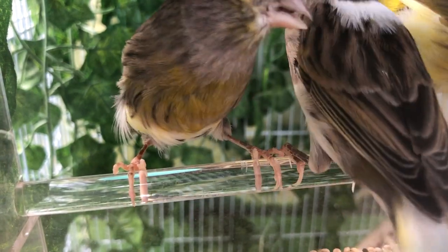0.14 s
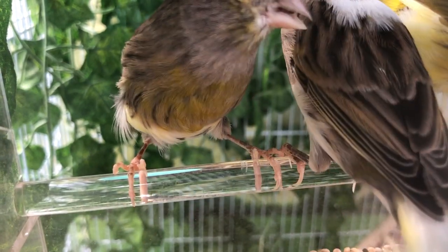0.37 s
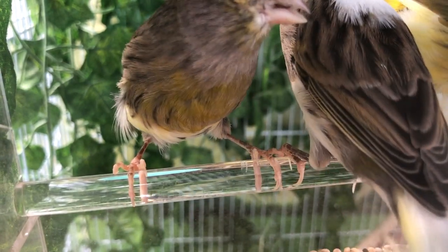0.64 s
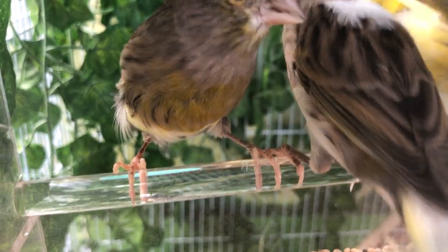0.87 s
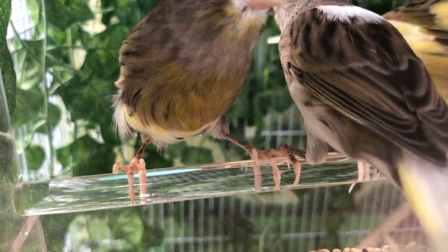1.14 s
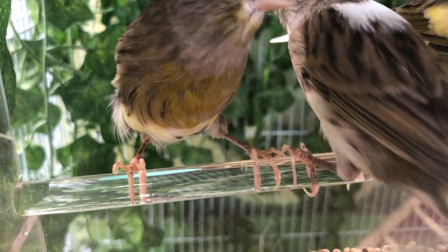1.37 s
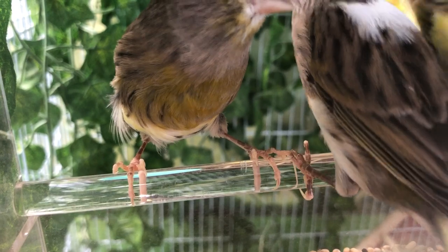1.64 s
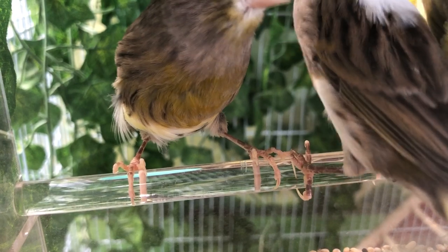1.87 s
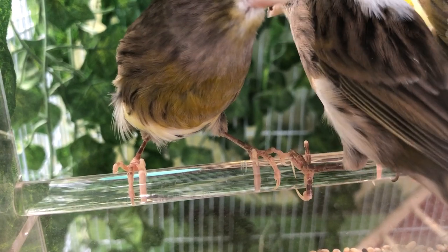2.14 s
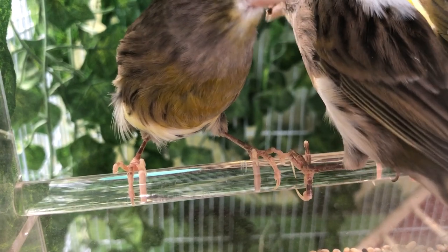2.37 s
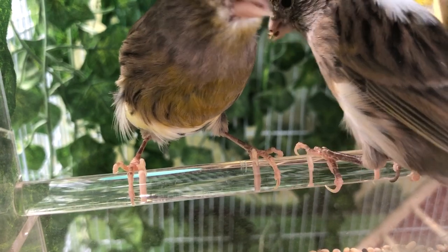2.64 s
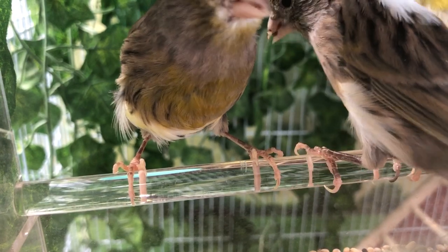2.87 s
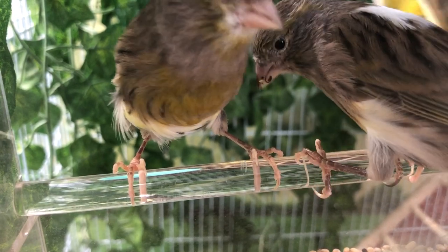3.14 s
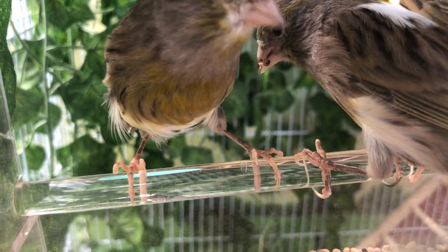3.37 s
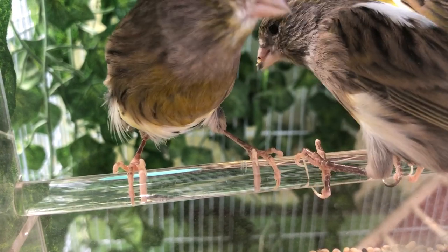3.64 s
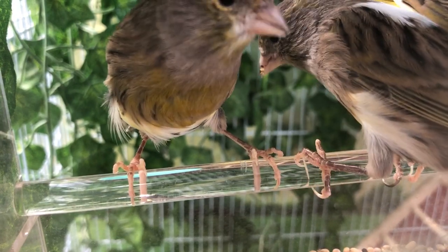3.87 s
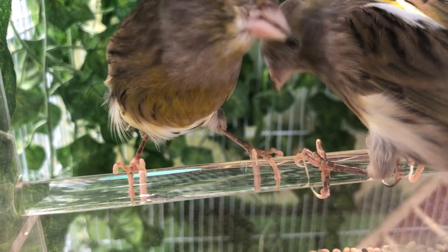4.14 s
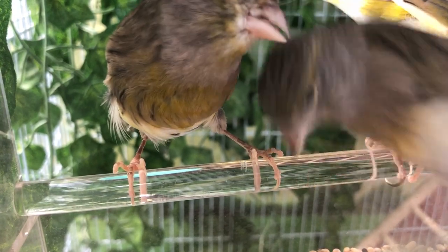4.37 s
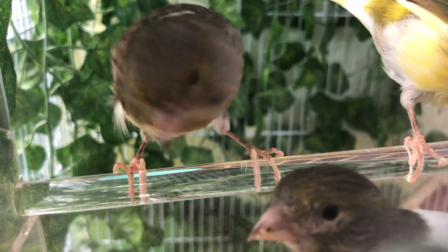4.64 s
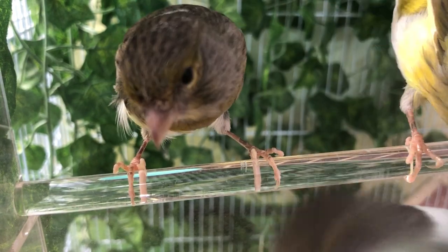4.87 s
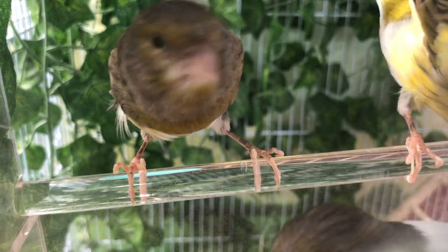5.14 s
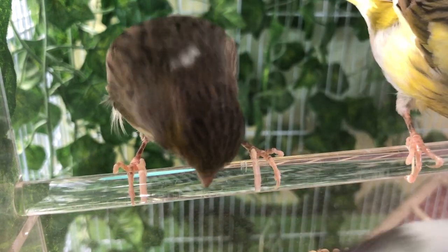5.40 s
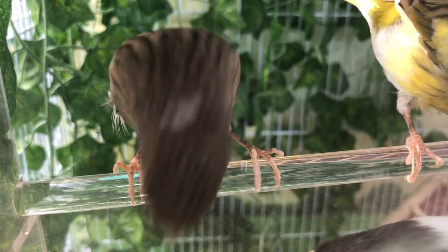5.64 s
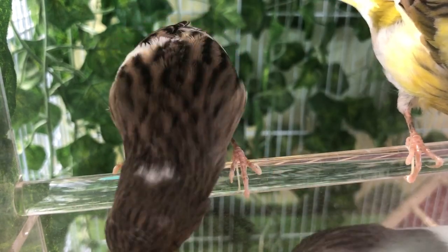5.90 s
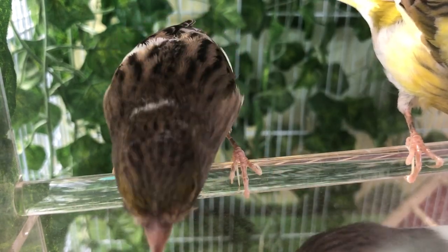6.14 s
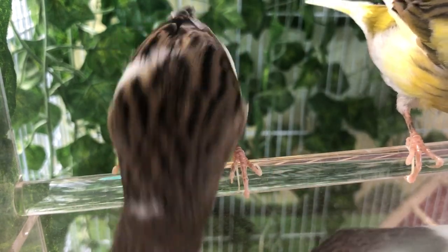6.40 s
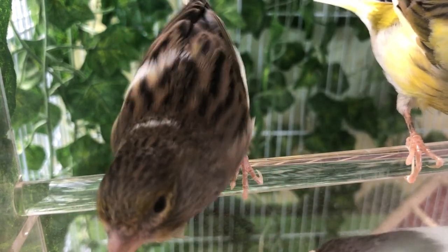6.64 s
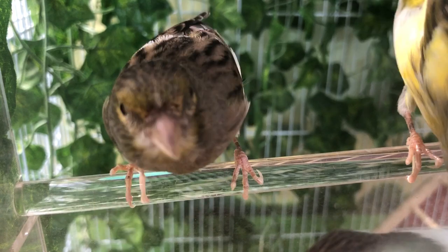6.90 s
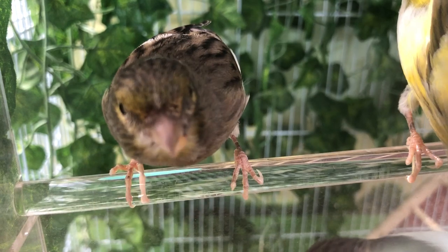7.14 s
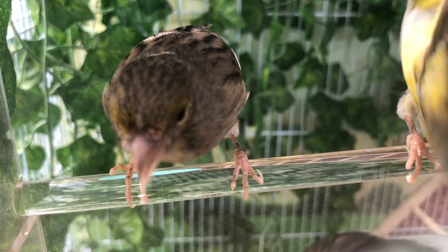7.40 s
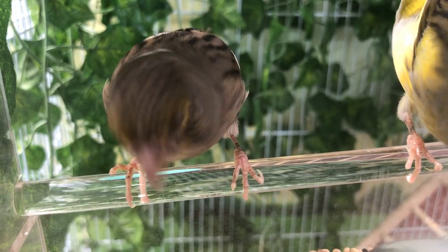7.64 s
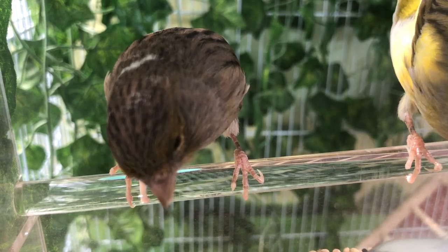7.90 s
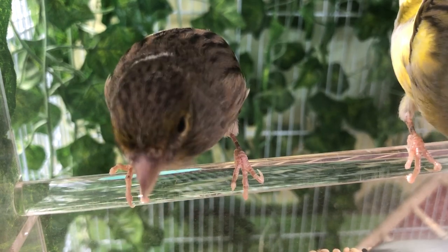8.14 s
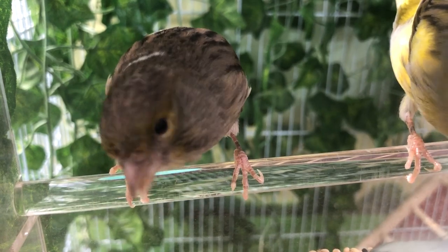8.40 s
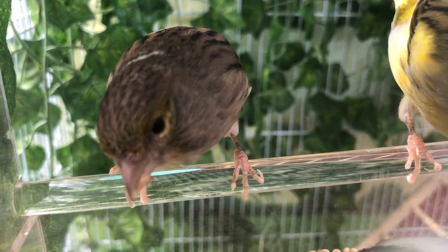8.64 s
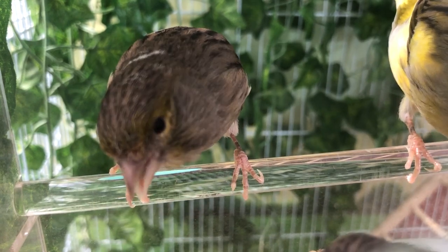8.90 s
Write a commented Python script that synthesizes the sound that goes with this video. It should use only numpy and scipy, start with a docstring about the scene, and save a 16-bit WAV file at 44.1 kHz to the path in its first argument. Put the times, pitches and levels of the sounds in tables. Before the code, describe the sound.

In a small, lightly echoing indoor aviary, canaries shuffle close to the microphone, feet knocking on the perch and claws ticking on wire. Short gliding chirps and distant rasps mix with faint flock chatter. A wavering dove-like coo comes three times. Paired chirps cluster in the first half, then a near bird breaks into loud, harsh rasping bursts through the second half over a soft steady room floor.

```python
"""Inside an aviary, one microphone: over a steady room floor feathers rustle, feet knock on the perch (struck modes)
and claws and husks tick on the wire (noise snaps). Birds further off rasp, others give single gliding notes,
a far flock chatters mostly as echo. A dove coos three times (wavering near sine), wing wash pushes air on the
microphone (low noise), a near bird rasps in harsh bursts (pulsed noise through throat and beak), two-voiced chirps
follow (overlapping gliding tones), and late on a faint low drone sets in."""
import sys
import numpy as np
from scipy import signal
from scipy.fft import rfft, irfft, next_fast_len
from scipy.io import wavfile
from scipy.ndimage import map_coordinates

SR = 44100
rng = np.random.default_rng(int(sys.argv[2]) if len(sys.argv) > 2 else 0)


def materialize(psi):
    """Save the field psi as 16-bit PCM at rate SR to the path in sys.argv[1].

    A 1-D psi becomes a single channel; in a 2-D psi each row is a channel.
    """
    bounded = np.clip(np.atleast_2d(psi).T, -1, 1)
    quanta = np.round(bounded * 32767).astype(np.int16)
    wavfile.write(sys.argv[1], SR, quanta)


def invert_db(x):
    """Field ratio 10**(x/20) for x, a level in decibels (scalar or array-like)."""
    u = np.asarray(x, float) / 20
    return 10 ** u


N = 397782   # samples

# room floor, relative spectrum: hz, level_db (per Hz)
FLOOR_SPECTRUM = [(15, -41), (25, 4.5), (145, -2), (277, -5.5), (451, -4.5), (800, -6), (2410, -10),
                  (4370, -19), (7710, -25.5), (16000, -24)]
FLOOR_DB = -60
ROOM_T60_S, WALL_CUT_HZ = 0.3, 8900

# feathers and shuffling feet: start_s, length_s, level_db
RUSTLES = [(0.0, 0.071, -51), (0.9, 0.12, -42.5), (1.06, 0.5, -52.5), (4.495, 0.18, -52.5),
           (5.06, 0.49, -55.5)]
RUSTLE_RISE_S, RUSTLE_FALL_S, RUSTLE_SLOPE_DB_PER_S = 0.0069, 0.013, -21

# feet landing on the perch: start_s, strike_db (before the level of each mode)
LANDINGS = [(0.037, -31), (0.948, -13), (0.956, -14.5), (1.051, -25), (1.087, -26), (1.184, -29),
            (1.23, -28), (1.554, -27.5), (1.679, -25), (2.665, -28), (4.501, -27.5), (4.585, -26),
            (4.646, -27), (5.121, -13.5), (5.126, -16), (5.267, -25), (5.768, -31.5)]
# ringing modes of the perch: mode_hz, level_db (relative), t60_s
PERCH_MODES = [(225, -2, 0.041), (336, -4, 0.05), (539, 0, 0.054), (605, -9, 0.033), (743, -14.5, 0.057),
               (1380, -6.5, 0.013), (1700, -14.5, 0.031), (2140, -23, 0.041), (2900, -7.5, 0.0052)]

# the clearest snaps of claws and husks on wire: start_s, peak_db
CLEAR_TICKS = [(0.038, -39), (0.099, -38), (0.134, -30.5), (0.1624, -32.5), (0.182, -41), (0.234, -32),
               (0.2893, -41), (0.556, -48), (0.9125, -19), (0.959, -14), (0.9917, -21), (1.002, -21),
               (1.056, -20.5), (1.107, -23), (1.492, -30), (1.557, -31), (1.904, -30), (2.807, -31),
               (3.084, -34), (3.5194, -19), (4.3375, -30), (4.5247, -23), (4.6, -32), (4.7425, -27.5),
               (5.075, -23.5), (5.092, -22), (5.12, -22), (5.127, -31), (5.147, -30), (5.159, -21),
               (5.184, -18), (5.253, -32), (5.602, -31), (5.7993, -20), (6.129, -21), (6.5513, -22),
               (6.8863, -20), (7.074, -37), (7.087, -30), (7.1516, -31), (7.233, -21), (7.2806, -28.5),
               (7.6466, -21), (9.01, -29)]
SMALL_TICK_DB = -47   # middle of the small ones' range
TICK_LOW_HZ, TICK_HIGH_HZ = 2500, 6000   # range of the bass edge of a snap

# harsh calls of birds further off: start_s, fade_s, level_db
FAR_RASPS = [(0.238, 0.089, -56.5), (0.383, 0.11, -48.5), (0.618, 0.033, -55.5), (0.8, 0.056, -42),
             (1.09, 0.15, -50), (1.54, 0.13, -49.5), (2.854, 0.046, -41), (3.24, 0.14, -56.5),
             (3.44, 0.019, -48), (5.598, 0.064, -42), (5.72, 0.05, -45.5)]
# throat of the further birds, relative spectrum: hz, level_db (per Hz)
FAR_THROAT = [(470, -66.5), (800, -40), (1440, -5), (1930, -8), (3050, -2.5), (4970, -12), (15000, -27.5)]
# harsh calls of the near bird, one row a burst: start_s, fade_s, level_db
NEAR_RASPS = [(1.714, 0.057, -30), (5.905, 0.056, -27.5), (6.024, 0.029, -24), (6.137, 0.068, -25.5),
              (6.299, 0.063, -25.5), (6.451, 0.073, -25), (6.607, 0.085, -25.5), (7.375, 0.055, -27),
              (7.425, 0.1, -31.5), (7.712, 0.079, -27.5), (8.013, 0.057, -26), (8.172, 0.056, -24.5),
              (8.308, 0.053, -27), (8.618, 0.1, -27.5), (8.797, 0.1, -28)]
# throat of the near bird, relative spectrum: hz, level_db (per Hz)
NEAR_THROAT = [(530, -107), (900, -25.5), (2250, -15.5), (2890, -7), (3230, -10), (4250, -0.5), (4740, -4),
               (6250, -10.5), (8660, -18), (10600, -19), (13000, -26), (15800, -23.5), (16500, -59)]
# resonances of its throat and beak: centre_hz, width_hz, level_db (relative)
NEAR_PEAKS = [(3600, 240, -6), (4250, 220, -1), (4800, 260, -4), (5450, 260, 1), (6300, 340, 2)]
NEAR_SWELL_S, FAR_SWELL_S = 0.043, 0.03
PEAK_WANDER_SHARE, PEAK_WANDER_HZ = 0.04, 9

# single gliding notes, mostly of other birds, some further notes of the two-voiced chirps: start_s, length_s,
# start_hz, end_hz, level_db
SINGLE_NOTES = [(0.248, 0.057, 598, 560, -61), (0.631, 0.024, 574, 566, -64.5),
                (0.787, 0.028, 2900, 4600, -44), (0.812, 0.061, 2900, 3660, -48),
                (0.833, 0.097, 1700, 1150, -52.5), (0.919, 0.038, 3595, 2780, -39.5),
                (1.106, 0.035, 3940, 3930, -39), (1.109, 0.028, 2000, 1890, -49),
                (1.142, 0.061, 1146, 1110, -49), (1.179, 0.062, 2100, 2500, -47),
                (1.22, 0.045, 4000, 3620, -45.5), (1.238, 0.043, 1270, 1160, -49),
                (1.462, 0.08, 1643, 2350, -54), (1.523, 0.033, 2860, 2900, -44),
                (1.607, 0.041, 3960, 3440, -45.5), (2.33, 0.049, 5130, 5620, -44.5),
                (2.396, 0.018, 4620, 4560, -39), (2.425, 0.031, 3930, 4400, -41),
                (2.403, 0.043, 3600, 3816, -31.5), (2.604, 0.05, 3630, 4110, -34),
                (2.591, 0.079, 4300, 4840, -39.5), (3.404, 0.063, 2750, 3350, -50.5),
                (2.881, 0.054, 3450, 3095, -36.5), (3.434, 0.055, 1440, 1880, -45.5),
                (3.58, 0.022, 4470, 4610, -37), (4.286, 0.094, 3160, 3324, -35.5),
                (4.29, 0.029, 4330, 3840, -48), (4.496, 0.037, 3310, 2820, -42),
                (4.661, 0.066, 2350, 2083, -48), (4.857, 0.03, 3960, 3700, -50),
                (4.905, 0.028, 3580, 3690, -40), (4.96, 0.05, 2783, 2940, -40.5),
                (4.966, 0.034, 1824, 2100, -53), (5.006, 0.067, 3100, 2847, -41),
                (5.316, 0.071, 2810, 3720, -51), (5.629, 0.032, 5180, 4920, -42),
                (5.731, 0.04, 3640, 3520, -39.5), (5.775, 0.063, 4010, 4245, -35),
                (5.895, 0.029, 3600, 3480, -39), (5.773, 0.051, 2024, 2393, -41.5),
                (6.603, 0.034, 1700, 1700, -41), (6.806, 0.038, 2690, 2807, -41),
                (6.91, 0.066, 3960, 3210, -44), (7.004, 0.034, 1936, 2670, -42),
                (7.032, 0.056, 4220, 3780, -42.5), (7.07, 0.07, 2574, 2593, -38),
                (7.166, 0.047, 2486, 2460, -40), (7.214, 0.045, 2180, 1380, -44),
                (7.254, 0.034, 2270, 2276, -41), (7.335, 0.033, 2587, 2580, -35.5),
                (7.345, 0.089, 3740, 3820, -34.5), (7.528, 0.024, 5300, 5170, -31),
                (7.54, 0.04, 2635, 2705, -37), (7.632, 0.093, 2600, 2415, -46),
                (7.916, 0.078, 4070, 3980, -35), (7.969, 0.019, 5200, 6000, -41.5),
                (8.131, 0.039, 3025, 4020, -29.5), (8.163, 0.019, 3820, 3750, -29.5),
                (8.441, 0.061, 3500, 3486, -30.5), (8.531, 0.078, 2500, 2465, -41),
                (8.755, 0.029, 3220, 3157, -36), (8.964, 0.047, 4084, 3780, -33)]
# two-voiced chirps, upper voice: start_s, length_s, start_hz, end_hz, level_db
UPPER_VOICE = [(2.307, 0.041, 4450, 3350, -33.5), (2.345, 0.026, 3550, 4300, -40),
               (2.512, 0.041, 4510, 3360, -32.5), (2.757, 0.028, 4200, 3850, -43),
               (2.868, 0.031, 5000, 3700, -32), (2.885, 0.1, 4106, 3670, -34),
               (3.547, 0.061, 4250, 3700, -30.5), (3.619, 0.04, 3950, 3830, -27.5),
               (3.697, 0.026, 4600, 4450, -45), (3.717, 0.06, 3550, 4150, -32.5),
               (3.9, 0.072, 4300, 3500, -42), (4.143, 0.085, 4470, 3600, -34),
               (4.238, 0.044, 3760, 3600, -28)]
# two-voiced chirps, lower voice: start_s, length_s, start_hz, end_hz, level_db
LOWER_VOICE = [(2.337, 0.04, 2580, 2830, -37.5), (2.362, 0.062, 3000, 3410, -36),
               (2.544, 0.068, 2610, 3170, -36), (2.776, 0.16, 2740, 2743, -48),
               (2.8, 0.063, 3140, 3070, -43.5), (2.938, 0.063, 2950, 3194, -37),
               (3.591, 0.06, 3050, 3030, -34.5), (3.665, 0.044, 2968, 3247, -32),
               (3.778, 0.061, 2980, 3045, -34), (3.951, 0.079, 2815, 2730, -50),
               (4.188, 0.045, 3100, 2803, -35), (4.27, 0.032, 2773, 2714, -32)]
GLIDE_HOOK = 0.36   # below 1: a note glides fast at first, then levels off
# overtones 2, 3, .. of high, nearly pure notes: level_db against the fundamental
PURE_DB = [-18, -29]
# overtones 2, 3, .. of lower, reedy notes: level_db against the fundamental
REEDY_DB = [3, -9, -16, -14]
# overtones 2, 3, .. of the lowest, nasal notes: level_db against the fundamental
NASAL_DB = [0.5, 8, -1, 7, -2, -2]
REEDY_BELOW_HZ, NASAL_BELOW_HZ = 2200, 800

# far flock, before its direct and echo shares: start_s, level_db, pitch_hz (around which notes scatter)
FLOCK = [(0.77, -89.5, 2330), (0.95, -56, 1845), (2.22, -52, 1975), (2.33, -56.5, 2814),
         (3.02, -55.5, 2698), (3.14, -58, 1792), (3.48, -54.5, 1882), (3.69, -46, 2988), (4.1, -60.5, 2500),
         (4.47, -62, 2750), (4.79, -54.5, 1965), (5.0, -48.5, 2900), (5.34, -56, 2422), (5.59, -47, 2576),
         (6.45, -63, 2950), (6.58, -39.5, 2586), (6.84, -53.5, 2624), (7.29, -49.5, 2395),
         (7.48, -47.5, 2454), (9.02, -45, 2498)]

# dove, one table a coo: start_s, pitch_hz, level_db
COOS = [
    [(0.88, 506, -50), (0.91, 609, -45), (1.17, 586, -50.5), (1.23, 520, -54.5), (1.412, 526.3, -49),
     (1.6, 544.4, -39.5), (1.82, 613, -44), (1.91, 560, -39), (2.23, 545.4, -42.5), (2.36, 491, -49),
     (2.52, 483, -79)],
    [(3.795, 515, -51), (3.82, 542, -45), (3.838, 620, -33), (4.0, 607, -49), (4.07, 606, -39.5),
     (4.11, 538, -43), (4.28, 569, -46.5), (4.5, 566, -37), (4.55, 608, -43.5), (4.63, 617, -34.5),
     (4.72, 611, -41.5), (4.8, 545, -36.5), (4.86, 504, -54.5), (4.97, 400, -64)],
    [(6.425, 496, -48), (6.465, 616, -38), (6.59, 614, -40), (6.7, 597, -51), (6.77, 536, -50.5),
     (7.12, 592, -42.5), (7.19, 623, -40.5), (7.3, 622, -36.5), (7.38, 615, -36.5), (7.46, 600.7, -44.5),
     (7.688, 550.4, -37.5), (7.82, 493, -52), (7.96, 495, -69)],
]
# syllables that the dove takes from below, after a short catch: start_s
SYLLABLES = [1.23, 1.7, 4.038, 4.567, 6.645, 7.215]
# moments when the dove's voice breaks: centre_s
BREAKS = [1.618, 1.86, 2.281, 3.9, 4.015, 4.09, 6.55, 6.628, 6.725, 6.83, 7.146, 7.341, 7.484]
SCOOP_SHARE, SCOOP_S, CATCH_DB, CATCH_S = 0.11, 0.03, -8, 0.006
BREAK_DB, BREAK_S = -20, 0.011

# wing wash on the microphone: start_s, length_s, level_db
WASHES = [(0.95, 0.55, -47), (2.9, 0.034, -47.5), (5.14, 0.31, -48), (6.3, 0.026, -43.5)]
WASH_RISE_S, WASH_FALL_S, WASH_SLOPE_DB_PER_S = 0.058, 0.1, 0.5

DRONE_FROM_S, DRONE_HZ, DRONE_WIDTH_HZ, DRONE_DB = 7.56, 159.3, 45, -65.5


def rms_one(x):
    """Scale to rms 1."""
    return x / np.sqrt(np.mean(x ** 2) + 1e-20)


def in_time(tables, quiet_db=-110, edge_s=0.012):
    """Join tables into one curve per column; a last gate curve falls silent between tables."""
    rows = []
    for table in tables:
        rows += [(table[0][0] - edge_s, *table[0][1:], quiet_db)]
        rows += [(*row, 0) for row in table]
        rows += [(table[-1][0] + edge_s, *table[-1][1:], quiet_db)]
    s, *columns = np.transpose(rows)
    *columns, gate_db = [np.interp(np.arange(N) / SR, s, c) for c in columns]
    return *columns, invert_db(gate_db)


def bouts(rows, rise_s, fall_s, slope_db_per_s):
    """Gain of separate bouts: each rises, slides in level while it lasts, and falls."""
    t = np.arange(N) / SR
    gain = np.zeros(N)
    for s, length, level_db in rows:
        rise = np.clip((t - s) / rise_s, 0, 1)
        fall = np.clip(1 + (s + length - t) / fall_s, 0, 1)
        gain += rise * fall * invert_db(level_db + slope_db_per_s * np.clip(t - s, 0, length))
    return gain


def drift(rate_hz):
    """Random wander of rms 1: noise through two equal low-pass poles at rate_hz."""
    r = np.exp(-2 * np.pi * rate_hz / SR)
    return rms_one(signal.lfilter([1], [1, -2 * r, r * r], rng.standard_normal(N + SR))[SR:])


def coloured(x, spectrum):
    """Shape a white signal by a spectrum; rms 1."""
    hz, level_db = np.transpose(spectrum)
    size = next_fast_len(N)
    bins = np.arange(1, size // 2 + 2) * SR / size
    gain = invert_db(np.interp(np.log(bins), np.log(hz), level_db))
    return rms_one(irfft(rfft(x, size) * gain, size)[:N])


def cut(x, hz, kind):
    """Second-order high-, low- or band-pass."""
    return signal.sosfilt(signal.butter(2, hz, kind, fs=SR, output="sos"), x + 1e-18)


def resonate(x, hz, width_hz):
    """One resonance, gain 1 on top."""
    r = np.exp(-np.pi * width_hz / SR)
    top = np.array([1, 0, -1]) * (1 - r * r) / 2
    return signal.lfilter(top, [1, -2 * r * np.cos(2 * np.pi * hz / SR), r * r], x + 1e-18)


def room_floor():
    """Steady coloured noise of the place, its level hardly moving."""
    return invert_db(FLOOR_DB) * coloured(rng.standard_normal(N), FLOOR_SPECTRUM) * invert_db(0.5 * drift(3.0))


def rustle():
    """Clumped bright grains over a dry hiss, settling down after each start."""
    born = rng.random(N) < 900 * invert_db(6 * drift(30)) / SR   # about 900 grains a second, in clumps
    size_db = 5.0 * np.minimum(rng.exponential(1, N), 5)
    grains = born * invert_db(size_db) * rng.choice([-1, 1], N)
    hiss = rng.standard_normal(N) * invert_db(3.5 * drift(40))
    gain = bouts(RUSTLES, RUSTLE_RISE_S, RUSTLE_FALL_S, RUSTLE_SLOPE_DB_PER_S)
    return gain * rms_one(cut(rms_one(grains) + 14.0 * hiss, 870, "high"))


def knocks():
    """Every landing rings the perch modes; light feet land softly and leave the upper modes weak."""
    s, strike_db = np.transpose(LANDINGS)
    chance_db = rng.normal(0, 2.5, (len(s), len(PERCH_MODES)))
    tilt_db = 0.54 * (strike_db - strike_db.max())   # per octave
    out = np.zeros(N)
    for k, (hz, level_db, t60) in enumerate(PERCH_MODES):
        clicks = np.full(N, 1e-18)
        clicks[(s * SR).astype(int)] = invert_db(strike_db + level_db + chance_db[:, k] + tilt_db * np.log2(hz / 230))
        r, w = invert_db(-60 / (t60 * SR)), 2 * np.pi * hz / SR
        out += signal.lfilter([0, np.sin(w)], [1, -2 * r * np.cos(w), r * r], clicks)
    return cut(out, 636, "high")   # a thin rod radiates no bass


def ticks():
    """Each tick is a bright noise snap with a decay of 0.9 ms; small ones come at random."""
    out, t = np.zeros(N + SR), np.arange(200) / SR
    small = [(when * N / SR, SMALL_TICK_DB + 9 * (size - 0.5)) for when, size in rng.random((25, 2))]
    rows = small + CLEAR_TICKS
    for (s, peak_db), noise in zip(rows, rng.standard_normal((len(rows), 201))):
        edge_hz = np.interp(noise[200], [-1, 1], [TICK_LOW_HZ, TICK_HIGH_HZ])   # last draw sets the edge
        snap = cut(noise[:200] * np.exp(-t / 0.0009), edge_hz, "high")
        out[round(s * SR):][:200] += invert_db(peak_db) * snap / np.abs(snap).max()
    return out[:N]


def room(x):
    """Diffuse echo: noise dying at the room's rate, dulled by the walls, energy 1."""
    t = np.arange(int(SR * 0.7)) / SR
    dulled = cut(rng.standard_normal(len(t)), WALL_CUT_HZ, "low")
    tail = dulled * invert_db(-60 * t / ROOM_T60_S) * np.minimum(t / 0.0015, 1)
    return signal.fftconvolve(x, tail / np.sqrt(np.sum(tail ** 2)))[:N]


def rasps(bursts, swell_s, throat, peaks, pulse_hz):
    """Chaotic syrinx: uneven pulses gate a noise that rings in throat and beak."""
    effort, t = np.zeros(N), np.arange(N) / SR
    for s, fade, level_db in bursts:
        arch = np.interp(t, [s, s + swell_s, s + swell_s + fade], [0, np.pi / 2, np.pi])
        push = np.abs(np.sin(arch))   # one push of breath, catching abruptly
        effort += invert_db(level_db) * np.where(t < s + swell_s, push ** 0.87, push ** 0.63)
    cycle = np.cumsum(pulse_hz * (1 + 0.27 * drift(60))) / SR % 1
    pulses = 0.45 + np.exp(-cycle / 0.3)
    breath = rng.standard_normal(N) * pulses * invert_db(2 * drift(200) + 1.2 * drift(40))
    breath = coloured(breath, throat)
    # the colour shifts in patches as the beak moves; alternate signs join neighbouring bands
    edges_hz = np.geomspace(800, 18000, num=13)
    voice = np.zeros(N)
    for k in range(12):
        voice += (-1) ** k * invert_db(2.8 * drift(90)) * cut(breath, edges_hz[k:k + 2], "band")
    # each resonance swells on its own
    strands = sum(invert_db(db + 4 * drift(45)) * resonate(voice, hz, width) for hz, width, db in peaks)
    # reading faster or slower shifts the resonances together
    pace = 1 + PEAK_WANDER_SHARE * drift(PEAK_WANDER_HZ)
    wandering = map_coordinates(strands, [np.cumsum(pace)], order=3, mode="mirror")
    return effort * rms_one(voice + invert_db(1.0) * wandering)


def note(hz, waver, throb, overtones_db):
    """One syllable: a wavering, throbbing sine with overtones, quick to start and slower to fade."""
    t = np.linspace(0, 1, len(hz))
    phase = 2 * np.pi * np.cumsum(hz * (1 + waver)) / SR
    tone = np.sin(phase) + sum(invert_db(db) * np.sin((k + 2) * phase) for k, db in enumerate(overtones_db))
    return np.minimum(t / 0.078, 1) * np.cos(np.pi * t / 2) ** 0.16 * throb * tone


def chirps():
    """Single notes, and the two sides of the syrinx overlapping; fast warble and turbulent air hoarsen all."""
    out = np.zeros(N)
    waver = 0.012 * drift(150) + 0.007 * drift(600)
    throb = invert_db(3 * drift(110)) + 0.33 * rms_one(cut(rng.standard_normal(N), 800, "low"))
    throb += 0.0087 * rng.standard_normal(N)   # breath hiss
    for k, (s, length, start_hz, end_hz, level_db) in enumerate(UPPER_VOICE + LOWER_VOICE + SINGLE_NOTES):
        start = round(s * SR)
        along = np.linspace(0, 1, int(length * SR))[:N - start]
        hz = start_hz * (end_hz / start_hz) ** along ** GLIDE_HOOK
        if hz.max() < NASAL_BELOW_HZ:
            timbre = NASAL_DB
        elif hz.max() < REEDY_BELOW_HZ:
            timbre = REEDY_DB
        else:
            timbre = PURE_DB
        own = slice(k * 3700, k * 3700 + len(hz))   # each note's stretch of waver and throb
        out[start:][:len(hz)] += invert_db(level_db) * note(hz, waver[own], throb[own], overtones_db=timbre)
    return out


def chatter():
    """Many far birds: short hoarse notes at random around a wandering pitch, over harsh noise."""
    level_db, centre_hz, gate = in_time([FLOCK])
    out, waver, throb = np.zeros(N + SR), 0.03 * drift(135), invert_db(6 * drift(188))
    for start, spread, glide, length, size, place in rng.random((900, 6)):
        at = int(start * N)
        t = np.linspace(0, 1, int(SR * (0.01087 + 0.0306 * length)))
        hz = centre_hz[at] * 2 ** (1.3 * (spread - 0.55) + 0.67 * (glide - 0.5) * t)
        first = int(place * N * 0.9)
        own = slice(first, first + len(t))
        out[at:at + len(t)] += invert_db(7 * size) * note(hz, waver[own], throb[own], overtones_db=[-14])
    band = cut(rng.standard_normal(N), [1300, 4500], "band")
    harsh = rms_one(cut(band, 870, "high")) * invert_db(4.5 * drift(6))
    return gate * invert_db(level_db) * (rms_one(out[:N]) + invert_db(-11.5) * harsh)


def coo():
    """A near sine on its pitch track, wavering in pitch and throbbing in level."""
    hz, level_db, gate = in_time(COOS)
    t = np.arange(N) / SR
    since = t - np.array(SYLLABLES)[:, None]
    hz = hz * (1 - SCOOP_SHARE * np.sum((since > 0) * np.exp(-np.abs(since) / SCOOP_S), axis=0))
    level_db = level_db + CATCH_DB * np.sum(np.exp(-(since / CATCH_S) ** 2), axis=0)
    away = t - np.array(BREAKS)[:, None]
    level_db = level_db + BREAK_DB * np.sum(np.exp(-(away / BREAK_S) ** 2), axis=0)
    phase = 2 * np.pi * np.cumsum(hz * (1 + 0.0113 * drift(29.2))) / SR
    return np.sqrt(2) * gate * invert_db(level_db + 2.2 * drift(30)) * np.sin(phase)


def wash():
    """Wing beats push air on the microphone: lumpy low noise, flickering in level."""
    air = cut(cut(rng.standard_normal(N), [32, 180], "band"), 1300, "low")
    gain = bouts(WASHES, WASH_RISE_S, WASH_FALL_S, WASH_SLOPE_DB_PER_S)
    return gain * rms_one(air * invert_db(3.5 * drift(25)))


def drone():
    """A faint low hum: noise twice through one low resonance."""
    hum = rng.standard_normal(N)
    for _ in range(2):
        hum = resonate(hum, DRONE_HZ, DRONE_WIDTH_HZ)
    onset = np.clip((np.arange(N) / SR - DRONE_FROM_S) / 0.037, 0, 1)
    return invert_db(DRONE_DB) * onset * rms_one(hum)


def scene():
    """Each source at its distance, with its own share of direct sound and echo."""
    cage = knocks() + ticks()
    far = rasps(FAR_RASPS, FAR_SWELL_S, FAR_THROAT, [(2900, 120, -14.0)], pulse_hz=413)
    notes, flock, dove = chirps(), chatter(), coo()
    near = rasps(NEAR_RASPS, NEAR_SWELL_S, NEAR_THROAT, NEAR_PEAKS, pulse_hz=319.2)
    direct = rustle() + cage + far + notes + invert_db(-10.0) * flock + dove + wash() + near + drone()
    cage_echo = invert_db(-16.5) * cage
    bird_echo = invert_db(-12.5) * far + invert_db(-7) * notes + invert_db(-14) * dove + invert_db(-8) * near
    flock_echo = invert_db(2.0) * flock   # stronger than its direct sound
    echo = room(cage_echo + bird_echo + flock_echo)
    return (direct + echo + room_floor())[None]


def roll_off(x):
    """The treble ends steeply here."""
    return signal.sosfilt(signal.butter(12, 16990, fs=SR, output="sos"), x)


def record(dry):
    """A small microphone whose bass is cut by two high-passes."""
    mix = cut(cut(dry, 54, "high"), 45, "high")
    return roll_off(mix)


dry = scene()
out = record(dry)
materialize(out)
```